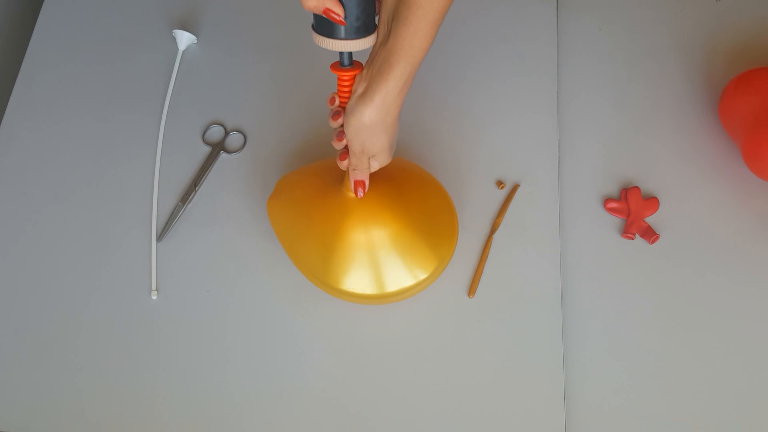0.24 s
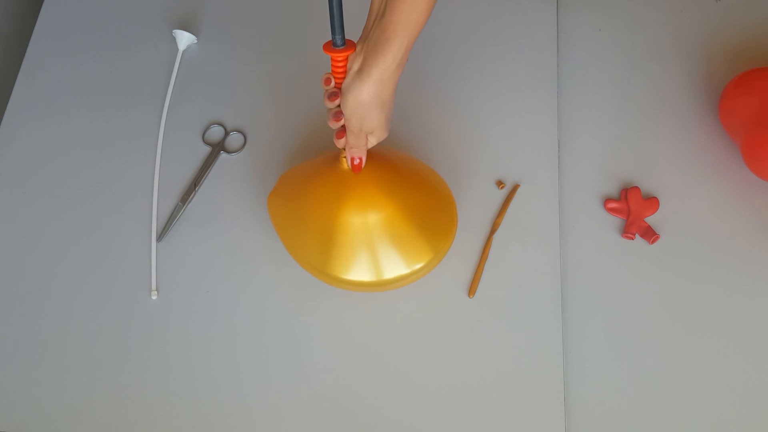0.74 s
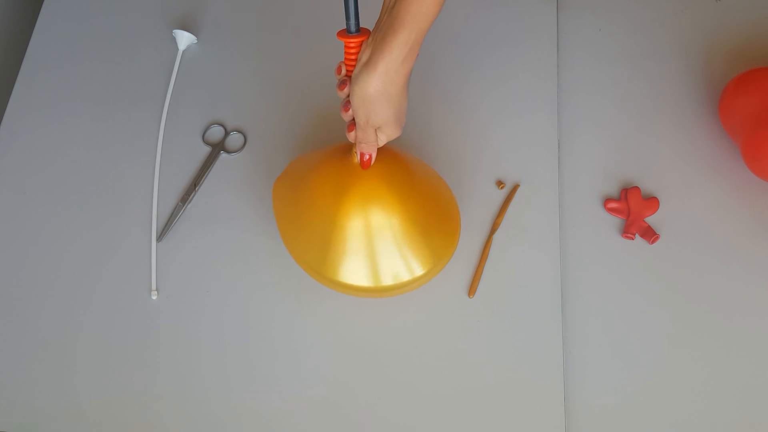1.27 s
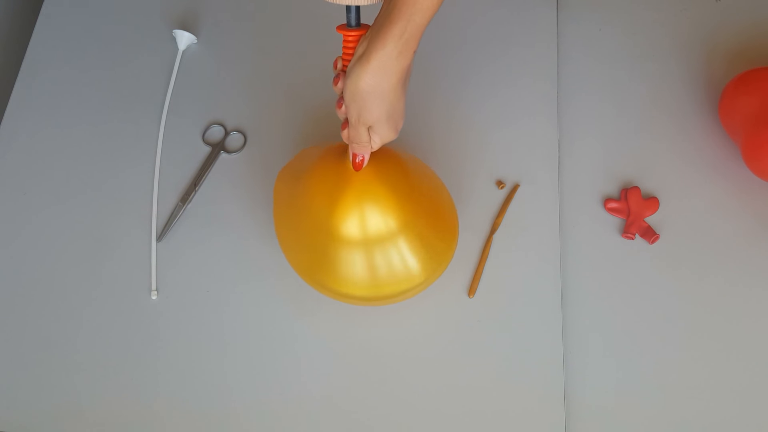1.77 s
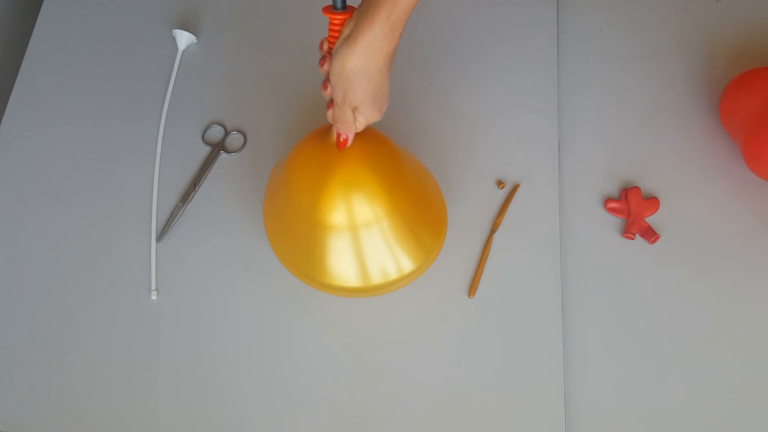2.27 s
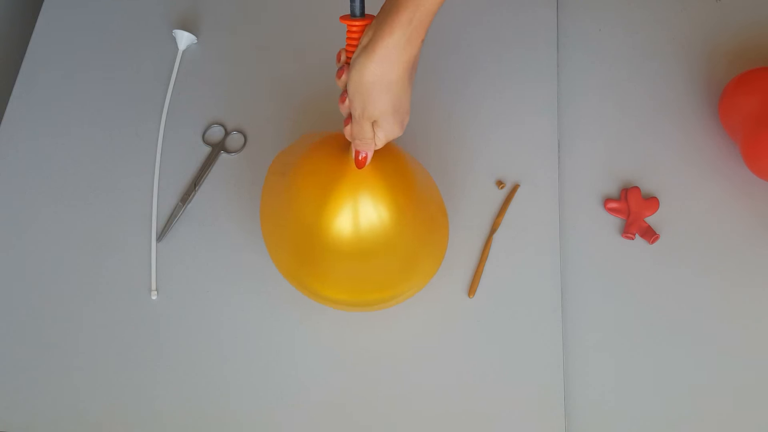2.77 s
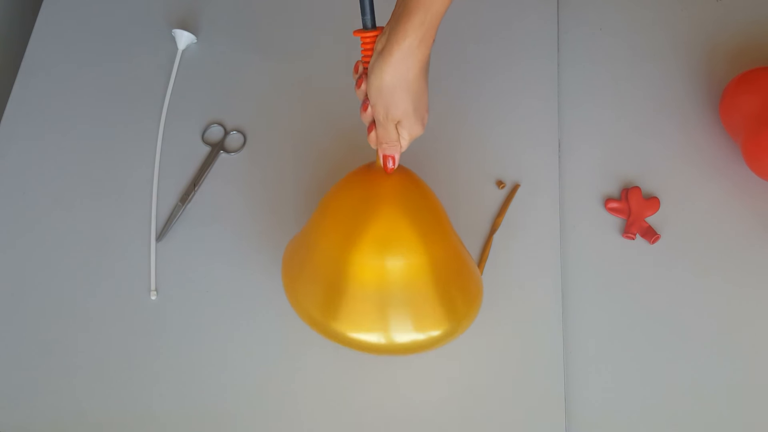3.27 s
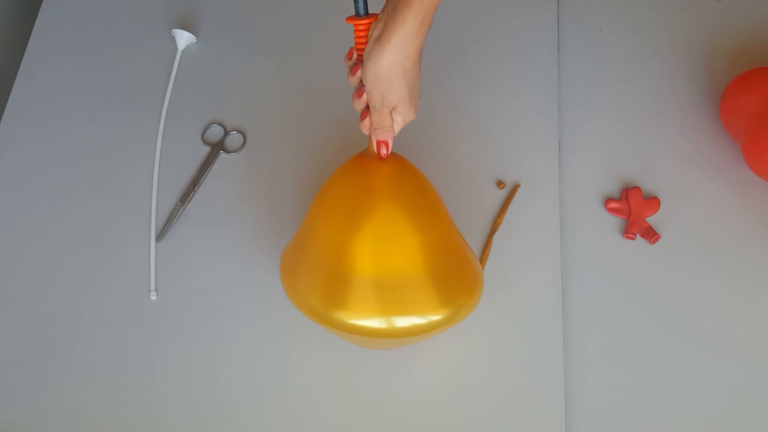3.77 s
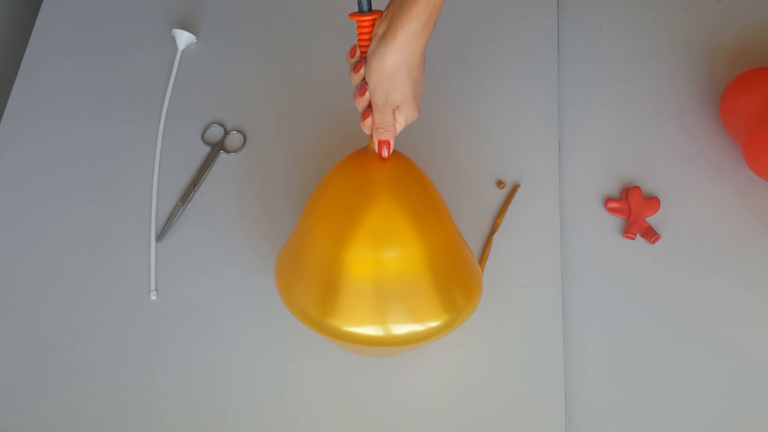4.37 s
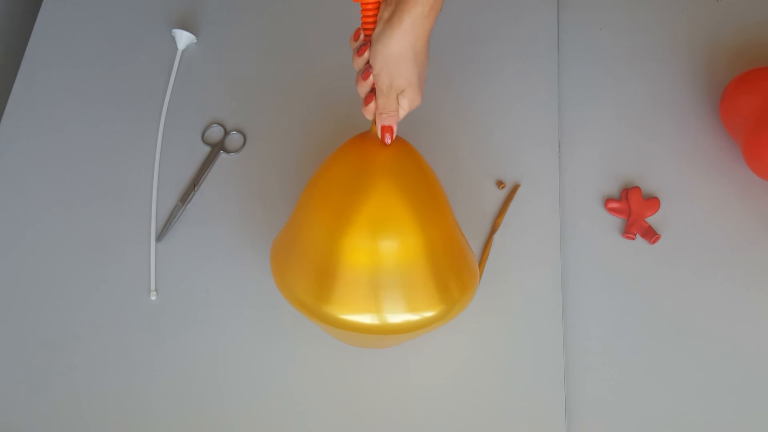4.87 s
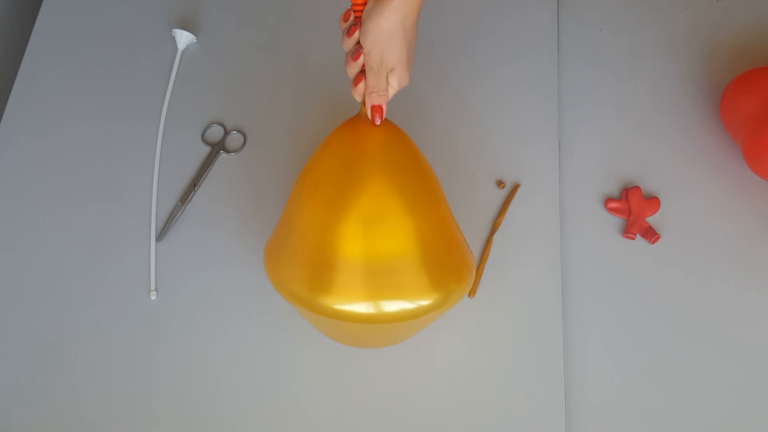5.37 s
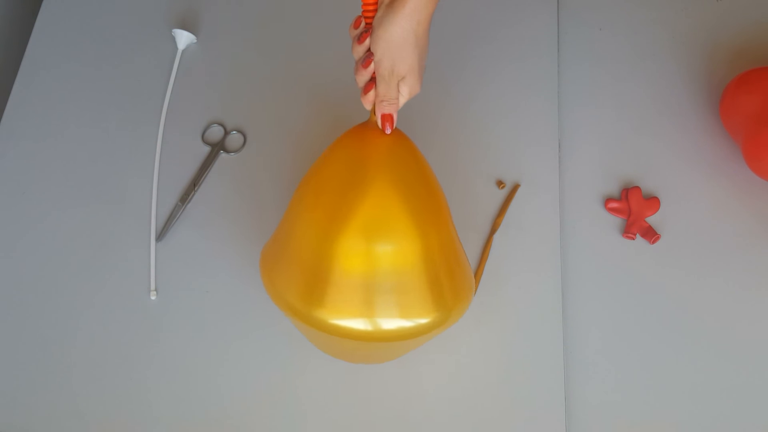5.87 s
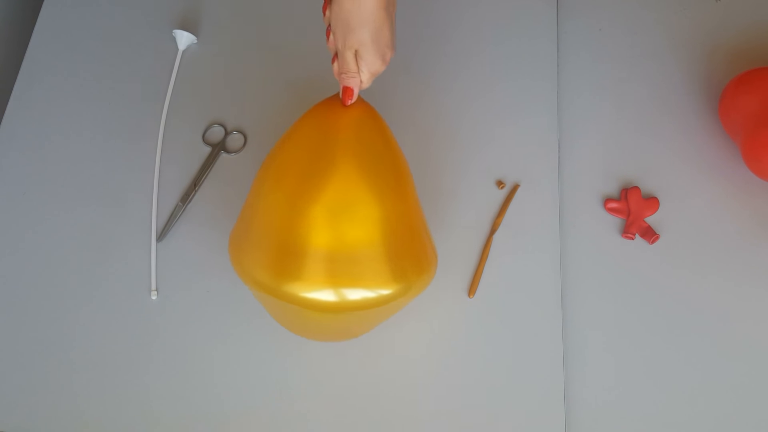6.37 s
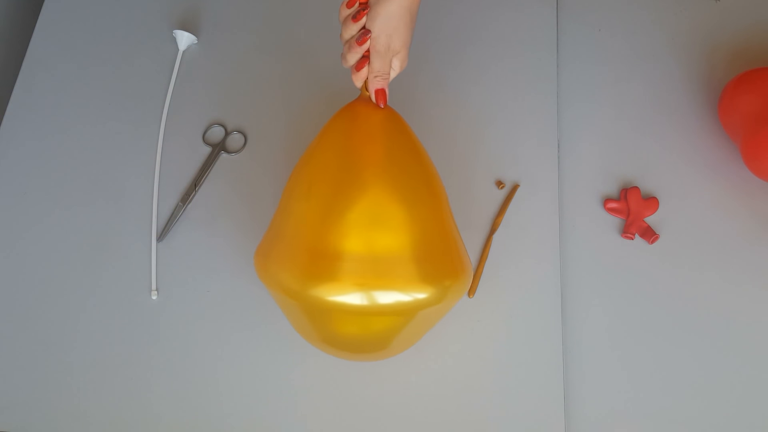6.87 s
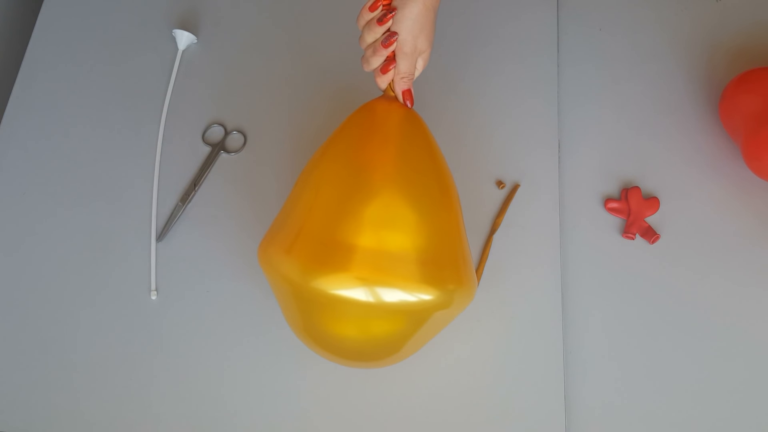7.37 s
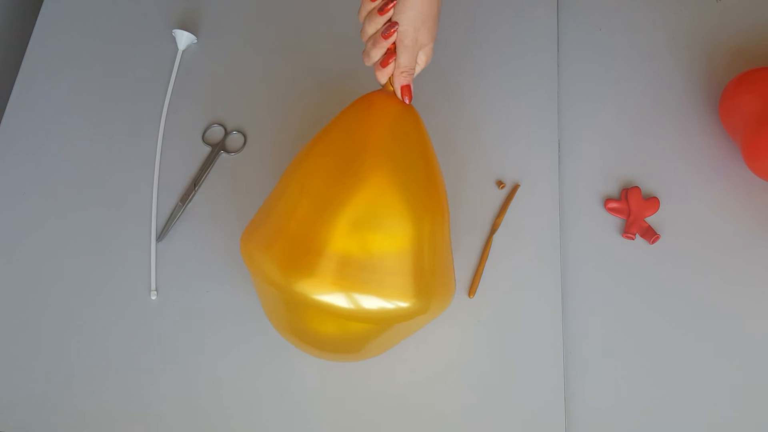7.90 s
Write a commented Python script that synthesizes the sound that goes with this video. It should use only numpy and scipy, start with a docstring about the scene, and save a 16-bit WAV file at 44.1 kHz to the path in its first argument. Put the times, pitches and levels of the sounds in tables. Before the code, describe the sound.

A hand pump works in quick even strokes, each a rasping, hollow rush of air into a latex balloon, with clicks and knocks at every turn.

```python
"""Hand pump filling a balloon

A double-action hand pump fills a latex balloon over a table, close by in a small room. Each stroke rushes
air through the nozzle as shaped noise and sounds the hollows of the pump as resonances; around the turns a flap
valve chuffs and the piston knocks, and the balloon shakes. Midway the pumping slackens and the balloon flops
onto the table with a boom of decaying modes. Whistles, leaks, latex snaps and rubber drags come between."""
import sys
import numpy as np
from scipy import signal
from scipy.fft import rfft, irfft, next_fast_len
from scipy.io import wavfile
from scipy.ndimage import uniform_filter1d, map_coordinates

SR = 44100
rng = np.random.default_rng(int(sys.argv[2]) if len(sys.argv) > 2 else 0)


def dump(signal):
    """Clip the signal to [-1, 1] and save it as 16-bit WAV at the path in sys.argv[1]."""
    limited = np.clip(np.atleast_2d(signal).T, -1, 1)
    pcm = np.round(limited * 32767).astype(np.int16)
    wavfile.write(sys.argv[1], SR, pcm)


N = 358974
SIZE = next_fast_len(N + SR // 2)
HZ = np.fft.rfftfreq(SIZE, 1 / SR)
TIME = np.arange(N) / SR

# Flap valve at the turns of the pump. Each row: time in seconds, chirp pitch in Hz,
# then relative levels in dB of the chirp, the thud and the sway of the balloon.
VALVE_TURNS = [(0.2627, 4480, -39.5, -54, -65), (0.6568, 4500, -41, -41, -53),
               (1.0532, 4520, -34.5, -47, -53), (1.4307, 5000, -42, -41, -48),
               (1.8294, 4060, -45, -41, -51), (2.1982, 4790, -46, -38.5, -47),
               (2.5689, 5220, -50, -42, -44.5), (2.911, 4280, -49, -41, -56),
               (3.7388, 4850, -39.5, -39, -43), (4.0998, 5000, -41.5, -40, -49),
               (4.448, 4350, -40, -40, -48.5), (4.849, 4950, -40, -38, -46), (5.1986, 4600, -41, -40, -50),
               (5.5898, 4720, -41, -39, -48), (5.9317, 4960, -38, -42, -49),
               (6.3165, 4400, -43, -41, -46.5), (6.7243, 4560, -38.5, -43.5, -49),
               (7.0976, 4570, -46, -39, -44), (7.4605, 4160, -42, -47, -52), (7.8615, 4640, -40, -37, -49)]


def amp(db):
    """Level law: decibels to amplitude gain."""
    return 10 ** (np.asarray(db) / 20)


def unit(x):
    """Normalization: x scaled to rms 1."""
    return x / np.sqrt(np.mean(x ** 2) + 1e-20)


def along(points, hz=HZ):
    """Interpolation of (Hz, value) points on a logarithmic frequency axis."""
    f, v = np.transpose(points)
    return np.interp(np.log(hz + 1), np.log(f), v)


def wobble(rate):
    """Slow random modulation: a smooth curve through random knots, rate of them a second."""
    knots = rng.standard_normal(int(N * rate / SR) + 4)
    return map_coordinates(knots, [TIME * rate])


def filtered(x, response):
    """Linear filtering: the spectrum of x times a response on the HZ grid."""
    return irfft(rfft(x, SIZE) * response, SIZE)[..., :N]


def resonance(hz, width_hz, f=HZ):
    """Frequency response of one damped resonance, 1 at its centre."""
    return 1j * f * width_hz / (hz * hz - f * f + 1j * f * width_hz)


def white():
    """White noise: independent complex Gaussian values at all frequencies."""
    return rng.standard_normal(2 * len(HZ)).view(complex)


def spread(colour):
    """Interaural coherence: mixing mid and side noise sets the left-right likeness at each frequency."""
    # Each row: frequency in Hz, left-right correlation.
    likeness = [(200, 0.96), (420, 1), (620, 0.24), (1400, -0.065), (2500, 0.74), (5000, 0.17),
                (12000, 0.013)]
    turn = np.arccos(np.clip(along(likeness), -1, 1)) / 2
    mid = np.cos(turn) * white()
    side = np.sin(turn) * white()
    return amp(along(colour)) * np.array([mid + side, mid - side])


def noise(colour):
    """Spectral shaping: stereo noise of rms 1 with the given colour."""
    return unit(irfft(spread(colour), SIZE)[:, :N])


def burst(rise, t60):
    """Transient envelope: a swell and an exponential decay, times in seconds, peak 1."""
    t = TIME[:SR // 3]
    shape = (1 - np.exp(-(t / rise) ** 2)) * amp(-60 * t / t60)
    return shape / shape.max()


def ringing(hz, width_hz, envelope):
    """Resonant filtering: stereo noise in one resonance, brought to rms 1 and put under an envelope."""
    n = len(envelope)
    response = resonance(hz, width_hz, np.fft.rfftfreq(n, 1 / SR))
    spectrum = rfft(rng.standard_normal((2, n))) * response
    return unit(irfft(spectrum, n)) * envelope


def add(track, s, sound):
    """Superposition: lays a sound into a track at s seconds."""
    start = max(round(s * SR), 0)
    part = track[..., start:start + sound.shape[-1]]
    part += sound[..., :part.shape[-1]]


def tautness(t):
    """Stretching of the membrane: 0 slack, 1 taut, rising linearly between."""
    start_s, length_s = 2.76, 0.91
    return np.clip((t - start_s) / length_s, 0, 1)


def pumping():
    """Flow envelope: each stroke speeds up, holds and dies away, and the stronger stroke dominates.

    Per sample: change from full flow, level, sharpness, fullness (dB), pulling (0 to 1)."""
    # Each row: start of full speed, attack and hold in seconds, release in dB per second,
    # then air flow, jet sharpness and fullness as relative levels in dB.
    piston_strokes = [(0.048, 0.14, 0.035, 163, -34, -2, -8.5), (0.48, 0.16, 0.017, 203, -34, 0, -8.5),
                      (0.816, 0.088, 0.076, 195, -34, -1.5, -9.0),
                      (1.22, 0.13, 0.051, 156, -35, -2.5, -8.5), (1.605, 0.1, 0.043, 196, -32, -4, -10),
                      (1.993, 0.11, 0.038, 182, -32.5, -3.5, -10), (2.343, 0.1, 0.056, 202, -33, -3.5, -10),
                      (2.714, 0.095, 0.02, 179, -30.5, -7, -9),
                      (3.085, 0.087, 0.0041, 139, -41.5, -15, -9.0),
                      (3.568, 0.15, 0.024, 156, -41, -6.0, -5),
                      (3.901, 0.11, 0.068, 257, -32.0, -8.5, -11.5),
                      (4.244, 0.099, 0.02, 176, -32, -7, -11), (4.601, 0.11, 0.12, 264, -37.5, -9, -8),
                      (5.001, 0.11, 0.031, 189, -34.5, -5.5, -8.0),
                      (5.356, 0.1, 0.097, 235, -36, -9.5, -9.0),
                      (5.732, 0.096, 0.024, 146, -33, -5.5, -8.5),
                      (6.079, 0.099, 0.082, 186, -35.5, -7.0, -8),
                      (6.472, 0.095, 0.071, 113, -38.5, -4.5, -4.5),
                      (6.886, 0.098, 0.035, 126, -35.0, -8, -10),
                      (7.249, 0.11, 0.036, 141, -37, -3.5, -5.5),
                      (7.638, 0.13, 0.066, 137, -38.5, -5.5, -6.5), (8.021, 0.13, 0.021, 88, -36.5, -1, -6)]
    attack_depth_db, ease_s = 26.5, 0.044  # climb within one attack time; easing into the release
    start, attack, hold, release, level_db, sharp_db, full_db = np.transpose(piston_strokes)[:, :, None]
    t = TIME[::SR // 1000]
    early = np.maximum(start - t, 0)
    late = np.maximum(t - start - hold, 0)
    drop_db = -attack_depth_db * (early / attack) ** 2 - release * (np.hypot(late, ease_s) - ease_s)
    share = amp(level_db + drop_db) ** 2
    share /= share.sum(0)  # one stroke hands over to the next
    pulling = np.arange(len(piston_strokes))[:, None] % 2 == 0
    curves = drop_db, level_db, sharp_db, full_db, pulling
    return [np.interp(TIME, t, (share * curve).sum(0)) for curve in curves]


def turbulence(state):
    """Jet noise exciting cavity resonances: low rush, mid rush, hiss and tone, slack (0) or taut (1)."""
    # Broad rush of the nozzle. Each row: frequency in Hz, relative level in dB for the
    # slack and for the taut balloon.
    nozzle_rush = [(176, -14, -22), (322, -10.5, -12), (445, -2.5, -12.5), (660, -10, -19.5),
                   (970, -5.5, -12), (1600, -10.5, -17), (2500, -6, -10), (3670, -12, -18.5),
                   (5000, -14, -23), (7170, -21, -22), (8000, -21, -30), (12300, -22.5, -24.5),
                   (13800, -26.5, -29.5), (15500, -32, -35)]
    # Air resonances of barrel and neck. Each row: frequency and width in Hz, relative level in dB
    # slack and taut, left-over-right level in dB, phase lead of the left in radians.
    air_modes = [(703, 83, -6, -10, 4.5, 1), (770, 230, -17, -39, 5, -0.86), (908, 48, -6, -12.5, -9, 0.8),
                 (1072, 24, -1.5, -4.5, -9, -0.1), (1252, 46, -7, -11, 10.5, -1),
                 (1380, 95, -9, -18, -15.5, -0.1), (1478, 57, -10.5, -11.5, -11, -3.5),
                 (1641, 17, 1.5, -6.5, 7, -0.7), (1738, 64, 2, -6.5, -2, 2), (1867, 46, -8.5, -7.5, 7, -1),
                 (2053, 67, -4.5, -7, 5, 1), (2223, 66, -0.3, 1.6, -0.5, 0.13), (2330, 33, -49, 3.5, 1, -5),
                 (2668, 42, 5.5, -3.5, 4, 0.8), (2817, 73, -45, -5.5, 6, 0.2), (3082, 16, -1.5, -3, -6, 2),
                 (3370, 19, -3.5, -9, -11.5, -2), (3363, 145, -4, -8.5, 2.5, -1),
                 (3966, 64, -11, -30.0, 17, 0.6), (4168, 42, -1, -8.5, 8.5, 1.4),
                 (4400, 250, -14.5, -24.5, -19.5, -0.5), (4630, 100, -23, -15.5, 0, -0.9),
                 (5110, 25, -0.5, -7.5, 7.5, 1.77), (5880, 90, -5.5, -17.5, -3, -0.5),
                 (6490, 115, -7.5, -18, 11.5, -1), (6890, 360, -9.5, -19, 4.5, -1.5)]
    jet = spread([(row[0], row[1 + state]) for row in nozzle_rush])
    tone = np.zeros_like(jet)
    for hz, width_hz, *levels, left_db, lead in air_modes:
        ears = amp([[left_db / 2], [-left_db / 2]]) * np.exp([[.5j * lead], [-.5j * lead]])
        tone += ears * (amp(levels[state]) * resonance(hz, width_hz) * white())
    both = jet + tone
    low = 1 / (1 + (HZ / 1400) ** 6)
    high = 1 - 1 / (1 + (HZ / 5200) ** 4)

    def band_rms(from_hz, to_hz):
        """Band level: rms of the combined sound between two frequencies."""
        return np.std(irfft(both.mean(0) * (HZ > from_hz) * (HZ < to_hz), SIZE))

    low_rms, mid_rms, high_rms = band_rms(450, 1400), band_rms(1500, 3600), band_rms(7000, 15000)
    low_rush = both * low / low_rms
    mid_rush = jet * (1 - low - high) / mid_rms
    hiss = jet * high / high_rms
    hollow = tone * (1 - low) / mid_rms
    return irfft(np.array([low_rush, mid_rush, hiss, hollow]), SIZE)[..., :N]


def shifting(x, depth_db):
    """Time-varying filtering: the colour of the rush varies at random in narrow, short patches."""
    z = signal.stft(x, nperseg=1024)[2]
    field = rng.standard_normal(z.shape[1:])
    field = uniform_filter1d(field, size=3, axis=0)
    field = uniform_filter1d(field, size=14, axis=1)
    return signal.istft(z * amp(depth_db * unit(field)), nperseg=1024)[1][:, :N]


def air():
    """Jet and cavity: a gentle flow sounds the hollows, a sharp jet buries them in hiss."""
    low_db, mid_db, hiss_db, tone_db, slit_db = -0.15, 0, 1.5, -0.43, -16  # balance of the layers
    low_grows, hiss_grows, tone_grows = 0.53, 1.1, 1  # dB per dB of flow: a fast jet is brighter
    mid_per_sharp, tone_per_sharp = 0.72, -0.073  # dB per dB: a sharp jet trades tone for hiss
    tone_knee_db = 12  # flow drop that costs the hollows one more dB, growing as its square
    upper_hz, upper_per_sharp, upper_slack_db, upper_taut_db = 3550, 0.82, 2.5, 6
    drop_db, level_db, sharp_db, full_db, pulling = pumping()
    taut = tautness(TIME)
    low, mid, hiss, tone = np.sqrt(1 - taut) * turbulence(0) + np.sqrt(taut) * turbulence(1)
    rush = low * amp(low_db + full_db + low_grows * drop_db)
    rush += mid * amp(mid_db + mid_per_sharp * sharp_db + drop_db - 1.5 * pulling * taut)
    rush += hiss * amp(hiss_db + sharp_db + hiss_grows * drop_db)
    upper = filtered(tone, 1 - 1 / (1 + (HZ / upper_hz) ** 20))  # the high hollows need a sharp jet
    upper_db = upper_per_sharp * sharp_db + upper_slack_db + (upper_taut_db - upper_slack_db) * taut
    tone = tone - upper + upper * amp(upper_db)
    hollow_db = tone_db + tone_per_sharp * sharp_db + tone_grows * drop_db
    hollow = tone * amp(hollow_db - (drop_db / tone_knee_db) ** 2 + 1.6 * wobble(35))
    # the return port adds a thin hiss
    slit = pulling * taut * amp(slit_db + drop_db) * ringing(6600, 330, np.ones(N))
    rasp = amp(0.59 * wobble(70) + 0.61 * wobble(450))  # the jet flutters in the rubber neck
    return shifting(amp(level_db) * rasp * (rush + hollow + slit), depth_db=2.5)


def whistles():
    """Frequency shifting: the slack neck pinches the jet into narrow noise around a gliding pitch."""
    # Each row: start and length in seconds, first and last pitch in Hz,
    # twice the resonance width in Hz, relative level in dB.
    neck_whistles = [(0, 0.18, 5000, 4390, 1200, -33), (0.381, 0.21, 5000, 5860, 1300, -33.5),
                     (0.451, .052, 5870, 5860, 160, -30), (0.491, 0.043, 6040, 6550, 700, -30.5),
                     (0.753, 0.11, 4490, 4240, 1310, -32.5), (1.141, 0.072, 4170, 3940, 500, -35.5)]
    out = np.zeros((2, N))
    for s, length, from_hz, to_hz, double_width_hz, db in neck_whistles:
        u = np.linspace(0, 1, int(length * SR))
        swell = np.sqrt(np.abs(np.sin(np.pi * u)))
        glide = np.exp(2j * np.pi * np.cumsum((to_hz - from_hz) * u) / SR)
        narrow = signal.hilbert(ringing(from_hz, double_width_hz / 2, swell))
        add(out, s, amp(db) * (narrow * glide).real)
    return out


def sway():
    """Forced vibration: the held balloon rumbles with the arm's effort, and each turn shakes and bumps it."""
    # Rumble colour. Each row: frequency in Hz, relative level in dB.
    rumble_colour = [(20, -32), (40, -13), (62, -1), (95, 2.5), (125, -7.5), (155, -2), (210, -16.5),
                     (280, -12.5), (325, -9.5), (380, -13.5), (520, -23), (1200, -58)]
    hold_slack_db, hold_taut_db, hold_grows = -61.5, -56.5, 0.55  # hold_grows: dB per dB of air flow
    lag_s, swell_s, swing_t60_s = 0.0222, 0.044, 0.36  # the balloon swings just after each turn
    shake_db, jolt_db = 0.5, 1.5  # a sway is part rumble, part soft bump
    jolt_hz, jolt_scatter, jolt_t60_s = 81.7, 0.17, .13  # scatter of the log pitch
    _, level_db, *_ = pumping()
    hold_db = hold_slack_db + (hold_taut_db - hold_slack_db) * tautness(TIME)
    power = amp(hold_db + hold_grows * (level_db - level_db.mean())) ** 2
    swing, jolt, bumps = burst(swell_s, swing_t60_s), burst(0.014, jolt_t60_s), np.zeros(N)
    for s, *_, sway_db in VALVE_TURNS:
        hz = jolt_hz * np.exp(jolt_scatter * rng.standard_normal())
        bump = jolt * np.sin(2 * np.pi * hz * TIME[:len(jolt)])
        add(power, s + lag_s - swell_s, (amp(sway_db + shake_db) * swing) ** 2)
        add(bumps, s + lag_s, amp(sway_db + jolt_db) * bump)
    return np.sqrt(power) * noise(rumble_colour) + bumps


def room(x):
    """Reverberation: convolution with a diffuse noise tail whose decay depends on frequency."""
    # Each row: frequency in Hz, reverberation time t60 in seconds.
    decay_times = [(100, 0.38), (1000, 0.54), (4000, 0.85), (15000, 0.19)]
    hz, t, z = signal.stft(rng.standard_normal((2, SR // 2)), SR, nperseg=256)
    decay = amp(-60 * t / along(decay_times, hz)[:, None])
    tail = signal.istft(z * decay, SR, nperseg=256)[1]
    delayed = np.pad(tail, ((0, 0), (200, 0)))  # delay in samples
    return signal.fftconvolve(x, delayed / np.linalg.norm(tail[0]), axes=1)[:, :N]


def valves():
    """Impulsive flow: the flap lets a puff through, chirps as it seats and thuds down the barrel."""
    # Puff colour. Each row: frequency in Hz, relative level in dB.
    puff_colour = [(150, -2.5), (550, -1), (1100, 4.5), (1900, 3.5), (2260, 7.5), (2480, -7), (2700, 8),
                   (3000, -5), (3800, -1.5), (6900, -1.5), (8500, -12.5), (12000, -5.5), (16000, -22)]
    puff_db, note_db = -38.5, -44  # at every turn: the puff and the note it sounds in the barrel
    slack_note_hz, taut_note_hz = 2635, 2280
    opening_s = .009
    out, puffs, t = np.zeros((2, N)), np.zeros(N), TIME[:SR // 3]
    falling_hz = 95 + 140 * np.exp(-t / 0.015)
    thud = np.sin(2 * np.pi * np.cumsum(falling_hz) / SR) * burst(0.0036, 0.079)
    for s, hz, chirp_db, thud_db, _ in VALVE_TURNS:
        lift = s - opening_s / 4  # the soft flap starts to lift before the air breaks through
        note_hz = slack_note_hz + (taut_note_hz - slack_note_hz) * tautness(s)
        add(out, lift, amp(chirp_db) * ringing(hz, 250, burst(opening_s, 0.063)))
        add(out, lift, amp(note_db) * ringing(note_hz, 96, burst(opening_s, 0.091)))
        add(out, s, amp(thud_db) * thud)
        add(puffs, lift, amp(puff_db) * burst(opening_s, 0.095))
    flutter = amp(0.99 * wobble(220))
    return flutter * (out + puffs * noise(puff_colour))


def leaks():
    """Leakage flow: air slips past the seal with a thin hiss while the pressure builds."""
    # Leaks at the start of a push. Each row: time of the peak in seconds, relative level in dB.
    seal_leaks = [(.34, -50), (1.13, -48), (1.902, -50.5), (3.45, -56), (6.39, -52), (7.15, -44),
                  (7.92, -44)]
    # Leak colour. Each row: frequency in Hz, relative level in dB.
    leak_colour = [(1000, -20), (4000, 0), (7000, -4), (9000, -6), (11500, 1), (15500, -7)]
    half_length_s = 0.034  # to 1/e of the peak
    swell = sum(amp(db) * np.exp(-((TIME - s) / half_length_s) ** 2) for s, db in seal_leaks)
    return swell * noise(leak_colour)


def knocks():
    """Impact and friction: the piston takes up its play with a dull plastic knock and a squeak of the seal."""
    # Each row: time in seconds, relative levels in dB of the knock and the squeak.
    piston_knocks = [(.325, -51.5, -66), (0.694, -46.5, -47), (1.094, -38, -51), (1.45, -61, -47),
                     (1.863, -37, -56), (2.223, -46, -46), (2.598, -39.5, -48), (2.981, -47, -42.5),
                     (3.418, -46, -38), (3.773, -48, -40), (4.134, -42, -52), (4.484, -41.5, -45),
                     (4.884, -40, -52), (5.223, -48, -42), (5.624, -41, -46), (5.954, -45, -40.5),
                     (6.374, -43, -50), (6.747, -54.5, -42), (7.143, -44, -56), (7.486, -38, -42),
                     (7.892, -45, -58)]
    # Knock colour. Each row: frequency in Hz, relative level in dB.
    knock_colour = [(100, -9), (300, 4), (450, -2), (570, -5), (1000, -18), (1380, -13), (1700, -10),
                    (2300, -11), (5000, -15), (15000, -38)]
    squeak_hz, squeak_scatter = 1413, 0.026  # scatter of the log pitch from turn to turn
    blows, squeaks, shape = np.zeros(N), np.zeros((2, N)), burst(0.0033, 0.072)
    for s, knock_db, squeak_db in piston_knocks:
        hz = squeak_hz * np.exp(squeak_scatter * rng.standard_normal())
        add(blows, s, amp(knock_db) * shape)
        add(squeaks, s, amp(squeak_db) * ringing(hz, 110, shape))
    return blows * noise(knock_colour) + squeaks


def snaps():
    """Sudden release: latex slips off a fingertip or the table; soft rubber has little top."""
    # Each row: time in seconds, relative level in dB, centre and width in Hz, t60 in seconds.
    latex_snaps = [(3.329, -32, 1100, 1040, 0.031), (3.3516, -38, 2200, 1490, 0.027),
                   (3.645, -27, 2450, 2000, 0.041), (4.627, -25.5, 2250, 400, 0.054),
                   (5.066, -26, 2280, 500, 0.033), (6.443, -34, 1200, 700, 0.049),
                   (7.0261, -18.5, 840, 497, 0.041), (7.0262, -25, 2580, 2500, 0.035),
                   (7.836, -29, 1030, 700, 0.042)]
    soft_hz = 5500
    out = np.zeros((2, N))
    for s, db, hz, width_hz, t60 in latex_snaps:
        add(out, s, amp(db) * ringing(hz, width_hz, burst(0.00018, t60)))
    return filtered(out, 1 / (1 + 1j * HZ / soft_hz))


def balloon():
    """Membrane modes: the balloon slaps and booms like a drum on landing; it also sways and later drags."""
    # Balloon meets table. Each row: time in seconds, relative level in dB, boost of the
    # skin note in dB, share of the free ring time.
    landings = [(3.329, -28.5, -19, 1), (3.645, -40, 16, .45)]
    # Modes of the boom. Each row: frequency in Hz, relative level in dB, free t60 in seconds.
    boom_modes = [(62.6, 5.5, 0.44), (92.6, -9.5, 0.96), (153, -6.5, 0.48), (327, -1.5, 0.29),
                  (431, -3, .17), (655, -14, 0.22), (760, -15, 0.32), (1225, -15, .2)]
    # Skin on table. Each row: frequency in Hz, relative level in dB.
    slap_colour = [(25, -34), (55, -16), (110, -2), (200, -2.5), (300, 1), (430, -4), (540, 1), (750, -4),
                   (1200, -8), (3000, -19), (9000, -63)]
    # Rubber drags on the table. Each row: time of the peak in seconds, relative level in dB.
    table_drags = [(7.06, -50), (7.45, -46), (7.52, -49), (7.88, -49)]
    # Drag colour. Each row: frequency in Hz, relative level in dB.
    drag_colour = [(40, -12), (100, 3), (170, -9), (330, 3), (430, -7), (600, -21), (1000, -16),
                   (3000, -31)]
    drag_half_s = 0.049  # to 1/e of the peak
    booms, slaps, t = np.zeros(N), np.zeros(N), TIME[:SR]
    onset = 1 - np.exp(-t / 0.0027)
    for s, db, skin_db, free in landings:
        add(slaps, s, amp(db - 6.5) * burst(0.0009, 0.5 * free))
        for k, (hz, level, t60) in enumerate(boom_modes):
            tone = np.sin(2 * np.pi * (hz * t + rng.random()))
            ring = tone * amp(-60 * t / (t60 * free)) * onset
            add(booms, s, amp(db + level + skin_db * (k == 2)) * ring)  # the third mode is the skin note
    drags = sum(amp(db) * np.exp(-((TIME - s) / drag_half_s) ** 2) for s, db in table_drags)
    total = booms + slaps * noise(slap_colour) + drags * noise(drag_colour) + sway()
    return total * amp([[.5], [-.5]])  # left slightly louder, in dB


def scene():
    """Superposition of direct sound, room reply and quiet room air."""
    # Room air. Each row: frequency in Hz, relative level in dB.
    quiet_colour = [(20, -22), (60, 0.5), (150, -7), (1100, -8.5), (2500, -11), (5000, -19), (16000, -26)]
    strokes = air() * amp([[.3], [-.3]]) + leaks()  # air slightly louder on the left, in dB
    small = valves() + knocks() + snaps() + whistles()
    quiet = amp(-59) * noise(quiet_colour)
    reply = room(amp(-12.5) * strokes + amp(-9.5) * small)
    return strokes + small + reply + balloon() + quiet


def record(dry):
    """Band limitation: nothing above the top frequency passes."""
    top_hz = 15850
    return filtered(dry, HZ < top_hz)


dry = scene()
out = record(dry)
dump(out)
```